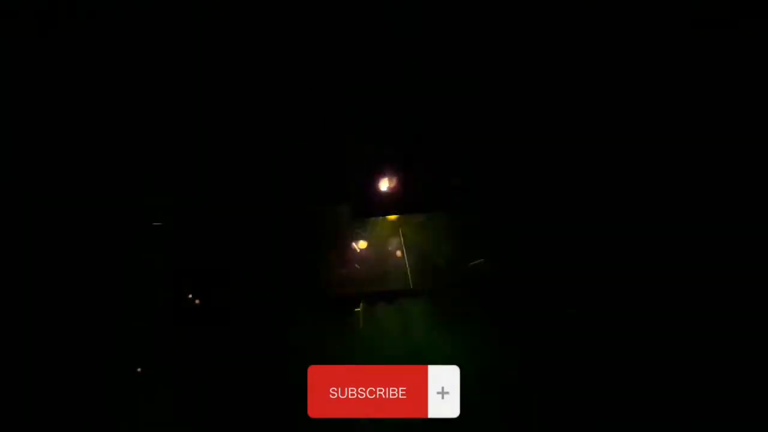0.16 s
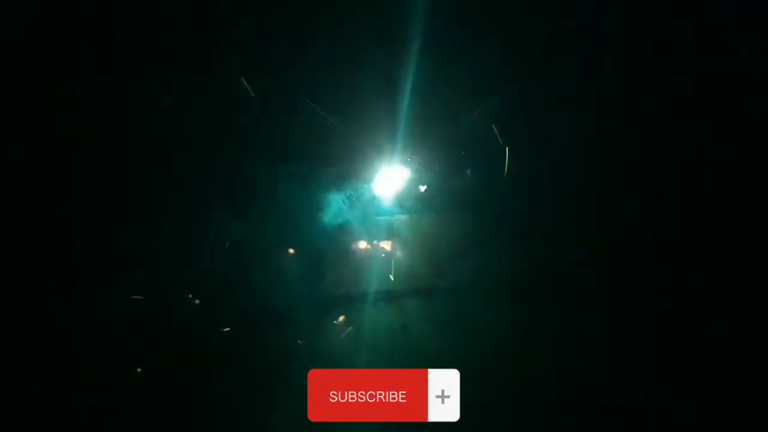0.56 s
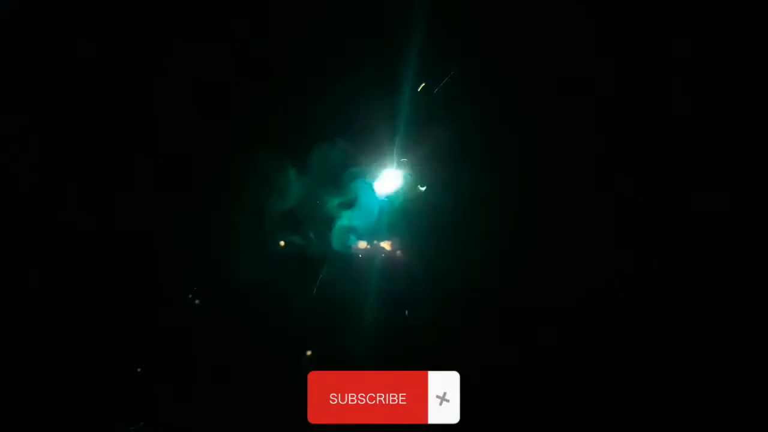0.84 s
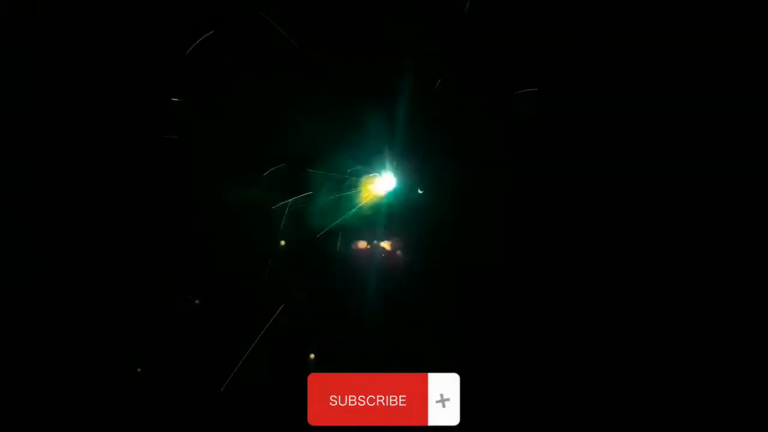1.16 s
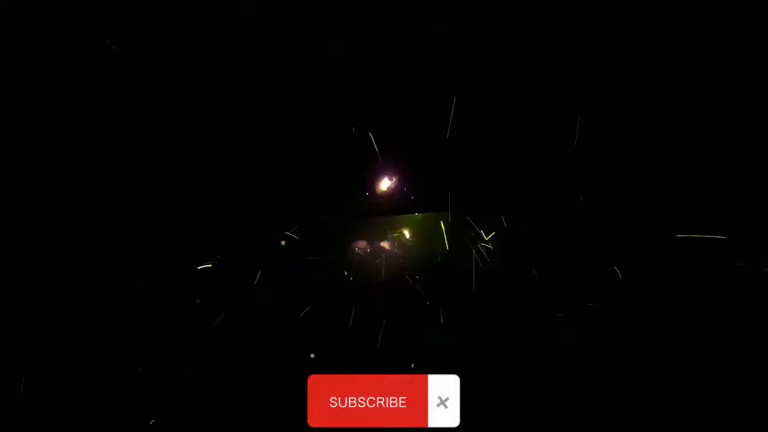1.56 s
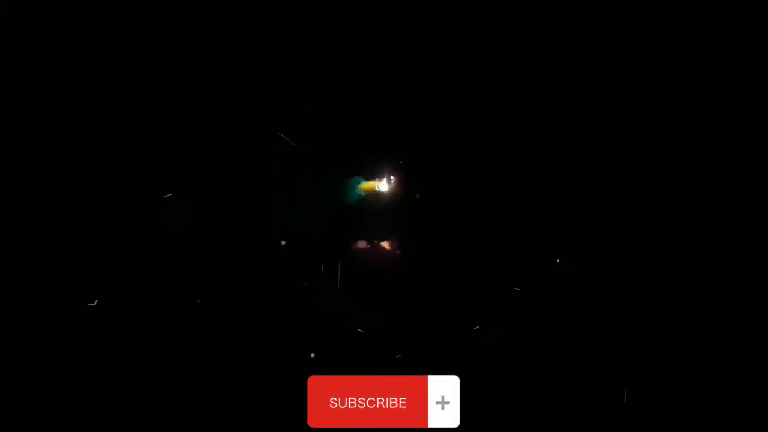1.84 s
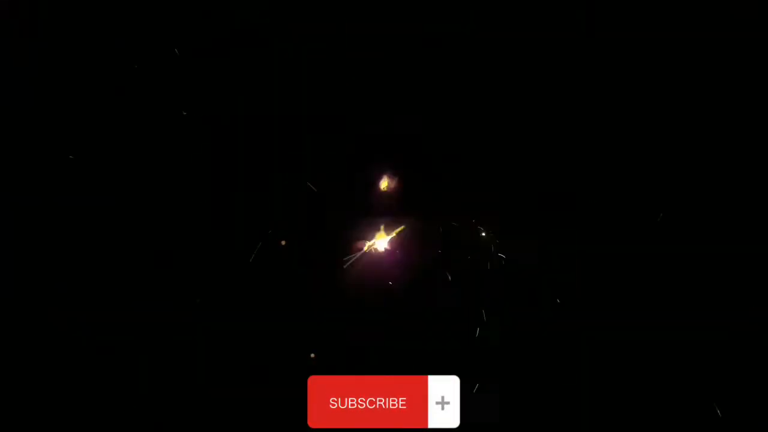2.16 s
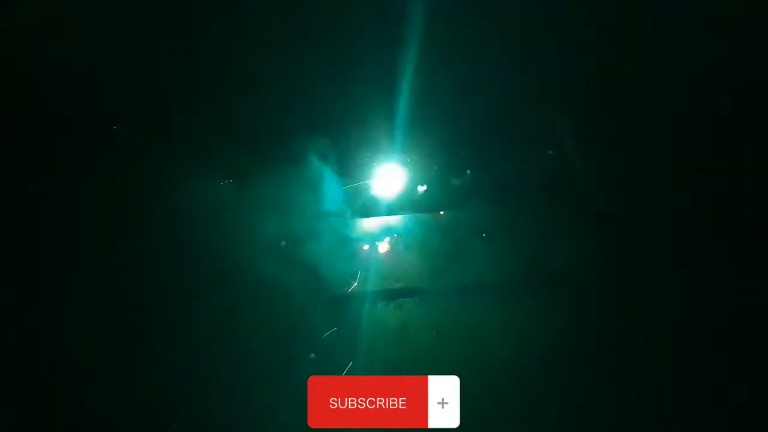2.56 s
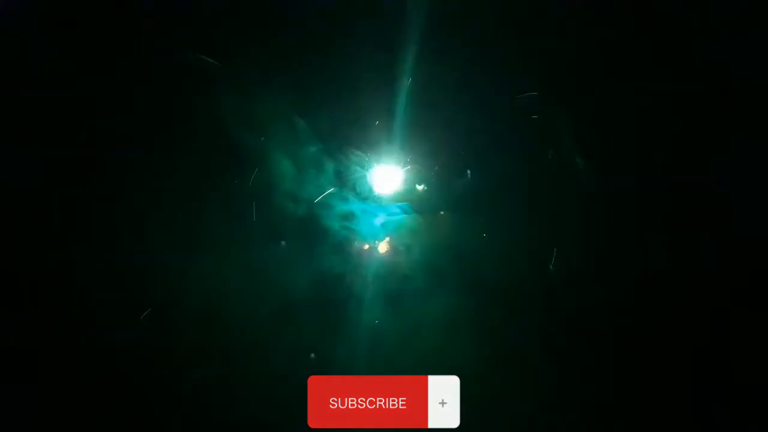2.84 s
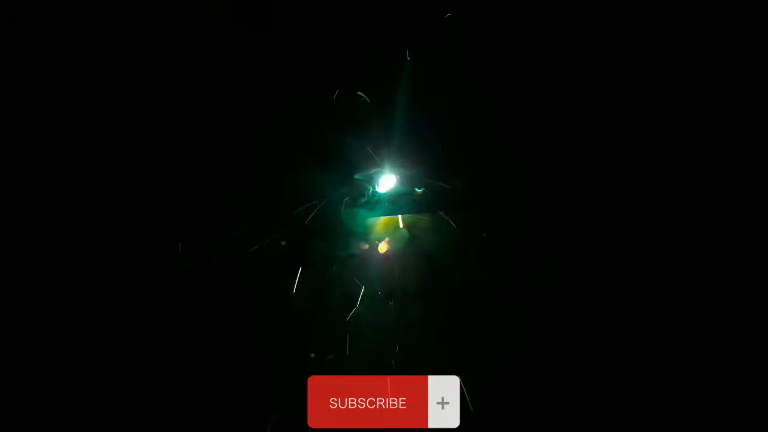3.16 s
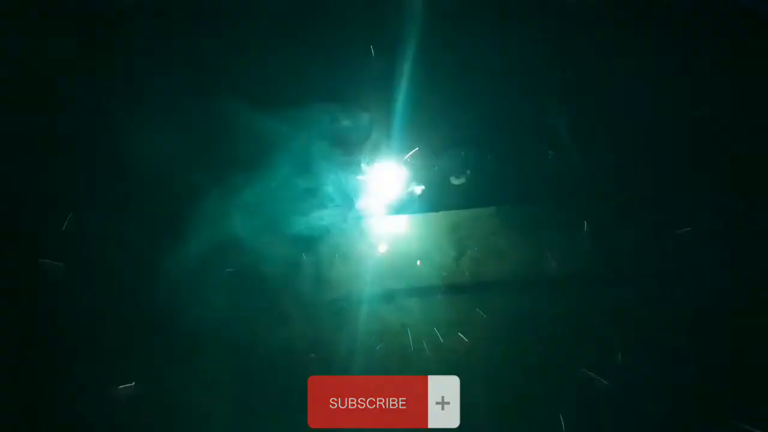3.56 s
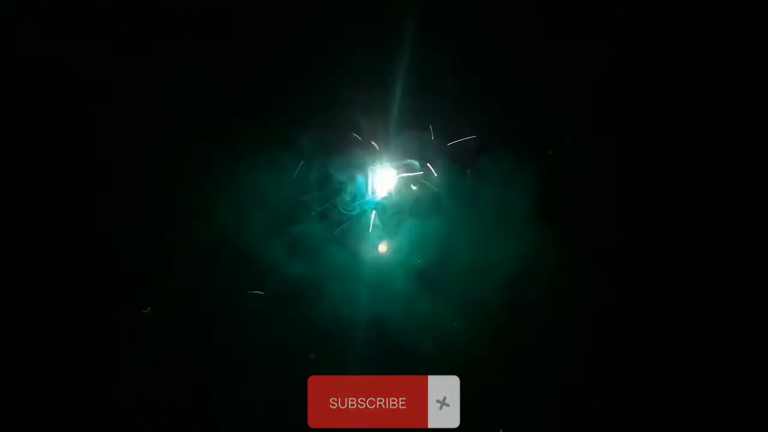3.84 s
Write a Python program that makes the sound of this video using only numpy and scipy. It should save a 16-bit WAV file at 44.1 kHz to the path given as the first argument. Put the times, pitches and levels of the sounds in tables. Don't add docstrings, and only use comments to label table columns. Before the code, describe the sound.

An electric welding arc sizzles and roars close to a small microphone, buzzing at about 100 hertz, with dense crackle, spitting drops and sharp spark cracks. At 1.5 s it stops, leaving short room ring and low hum. It relights at 1.7 s, with clustered hard snaps around 1.8, dies at 2.0, restarts near 2.2 and burns thinner, with a thumping snap at 2.4, scattered pops and fan drone swelling near the end.

```python
import sys
import numpy as np
from scipy import signal
from scipy.fft import rfft, irfft
from scipy.io import wavfile
from scipy.ndimage import uniform_filter1d

SR = 44100
rng = np.random.default_rng(int(sys.argv[2]) if len(sys.argv) > 2 else 0)


def dump(signal):
    limited = np.clip(np.atleast_2d(signal).T, -1, 1)
    pcm = np.round(limited * 32767).astype(np.int16)
    wavfile.write(sys.argv[1], SR, pcm)


def linear_from_db(decibels):
    return 10 ** (np.asarray(decibels, float) / 20)


N = 176400


def level(x, db):
    return x * linear_from_db(db) / np.sqrt(np.mean(x ** 2))


def colour(x, table):
    hz, db = np.array(table, float).T
    grid = np.maximum(np.fft.rfftfreq(4096, 1 / SR), 1)
    cepstrum = irfft(np.log(linear_from_db(np.interp(np.log(grid), np.log(hz), db))))
    cepstrum[1:2048] *= 2
    cepstrum[2049:] = 0
    return signal.fftconvolve(x, irfft(np.exp(rfft(cepstrum))))[:N]


def walk(rate):
    hold = int(SR / rate)
    steps = np.repeat(rng.standard_normal(N // hold + 1), hold)
    return 1.4 * uniform_filter1d(steps, hold)[:N]


def shop(t):
    # (frequency [Hz], level [dB])
    shop_tone = [(40, -21), (90, -5), (200, -2), (600, -8.5), (2500, -18.5), (8000, -41), (16000, -57)]
    # (time [s], pitch [Hz], level [dB])
    fan = [
        (0, 135, -61),
        (2.7, 139, -49),
        (3.0, 138.7, -56),
        (3.6, 137, -59),
        (3.8, 136.6, -40.5),
        (3.97, 137, -39.5),
        (4, 134, -54),
    ]
    # (time [s], level [dB])
    mains = [
        (0, -56),
        (1.3, -53),
        (1.5, -46),
        (3, -49),
        (4, -45),
    ]
    mains_hz = 50.1

    air = level(colour(rng.standard_normal(N), shop_tone), -47.5) * linear_from_db(walk(5.6))
    fan_s, fan_hz, fan_db = np.array(fan).T
    pitch = np.interp(t, fan_s, fan_hz) * (1 + 0.0041 * walk(7.8))
    drone = np.sin(2 * np.pi * np.cumsum(pitch) / SR) * linear_from_db(np.interp(t, fan_s, fan_db) + walk(17))
    hum_gain = linear_from_db(np.interp(t, *np.array(mains).T) + 2 * walk(8.15))
    transformer = hum_gain * np.sin(2 * np.pi * mains_hz * t + walk(12) / 2)
    return air + transformer + drone


def room(x):
    room_db, low_t60_s, high_t60_s = -6.5, 0.76, 0.3
    age = np.arange(SR // 2 * 2) / SR
    noise = rng.standard_normal(len(age)) * (age > .004)
    low = signal.lfilter([.4], [1, -.6], noise)
    tail = low * 1000 ** (-age / low_t60_s) + (noise - low) * 1000 ** (-age / high_t60_s)
    return linear_from_db(room_db) * signal.fftconvolve(x, tail / np.sqrt(np.sum(tail ** 2)))[:N]


def sparks(t):
    # (time [s], peak level [dB], pitch [Hz])
    spark_list = [(0.1478, -18, 4400), (0.176, -9.5, 7600), (0.2674, -14, 5200), (0.272, -14, 7700),
                  (0.2958, -5.5, 7400), (0.2973, -4.5, 8400), (0.4055, -13, 8000), (0.427, -11, 7100),
                  (0.4635, -15, 4900), (0.4941, 0, 6500), (0.7253, -1.5, 6700), (0.7444, -13, 6200),
                  (0.7647, -10, 7000), (0.8233, -20, 6500), (0.8741, -6.5, 6230), (0.8925, -11, 5900),
                  (0.995, -10, 6800), (1.025, -8, 8200), (1.0333, -6, 7800), (1.053, -12, 10500),
                  (1.057, -13, 8300), (1.1115, -4.5, 9000), (1.1158, -8, 8400), (1.1353, -4, 6400),
                  (1.152, -11, 7300), (1.1848, -10.5, 3900), (1.1915, -13, 8100), (1.2742, -12, 6100),
                  (1.3558, -17, 6500), (1.4336, -13, 7840), (1.4724, -13, 7900), (1.7426, -24, 9200),
                  (1.8646, -10, 10400), (1.93, -7, 8750), (2.2927, -9, 8150), (2.302, -11, 8540),
                  (2.452, -11, 10000), (2.4998, -10, 7100), (2.5224, -14, 7700), (2.5288, -15, 6400),
                  (2.6287, -14, 8200), (2.6815, -16, 9900), (2.7006, -10.5, 10000), (2.732, -25, 8400),
                  (2.8008, -15, 7300), (2.8463, -10.5, 7800), (2.9377, -7.5, 7700), (3.0147, -14, 7600),
                  (3.101, -13, 8900), (3.106, -15, 7200), (3.1465, -15, 8300), (3.1795, -18, 8000),
                  (3.1817, -21, 7100), (3.227, -10, 11800), (3.4549, -14, 7750), (3.4775, -12, 6900),
                  (3.6871, -2, 5600), (3.7573, -15.5, 5700), (3.868, -12.5, 6300), (3.9142, -4, 4900)]
    cycles, ring_db, ring_ms, spark_db = .5, -8, .4, -.6

    out = np.zeros(N)
    lead = 40
    age = t[:160] - t[lead]
    s, db, hz = np.array(spark_list).T[:, :, None]
    chance = rng.standard_normal((len(s), len(age) + 1))
    crack = np.cos(2 * np.pi * hz * age + chance[:, :1]) * np.exp(-(age * hz / cycles) ** 2)
    fade = np.exp(-np.abs(age) * (1 + 2 * (age < 0)) * 1000 / ring_ms)
    ring = linear_from_db(ring_db) * np.diff(uniform_filter1d(chance, size=2)) * fade
    both = crack + ring
    both = both * linear_from_db(db + spark_db) / np.abs(both).max(axis=1, keepdims=True)
    for i, spark in zip((s[:, 0] * SR).astype(int) - lead, both):
        out[i:i + len(age)] += spark
    return out


def snaps(t):
    snap_s = [.4943, .6569, .9833, 1.062, 1.792, 1.7925, 1.8115, 1.8121, 1.8146, 1.8226, 1.8261, 2.3873,
              2.4113, 3.071, 3.4582, 3.4666]
    # (spike level [dB], thump level [dB])
    snap_db = [(-39, -18), (-4, -8.5), (-3, -21), (1.5, -8.5), (-7.5, -12.5), (4, -13.5), (-5.5, -9),
               (1.5, -8), (-6, -31), (-20, -39), (-5.5, -24), (-8, 0), (-6.5, -40), (-8, -10.5),
               (-12, -18.5), (-13, -34)]
    spike_ms, rebound_ms, crack_ms, thump_ms = .04, .12, .2, 1.45
    rebound_db, crack_db = -8, -4

    out = np.zeros(N)
    lead = 20
    ms = (t[:2000] - t[lead]) * 1000
    after = (1 + np.tanh((ms - 2 * spike_ms) / spike_ms * 2)) / 2
    rebound = linear_from_db(rebound_db) * after * np.exp(-ms / rebound_ms)
    spike = np.exp(-(ms / spike_ms) ** 2 / 2) - rebound
    thump = after * np.exp(-ms / thump_ms)
    cracks = rng.standard_normal((len(snap_db), len(ms))) * linear_from_db(crack_db) * np.exp(-np.abs(ms) / crack_ms)
    for s, (spike_db, thump_db), crack in zip(snap_s, snap_db, cracks):
        i = int(s * SR) - lead
        sharp = spike + np.diff(crack, prepend=0) / 2
        out[i:i + len(ms)] += linear_from_db(spike_db) * sharp - linear_from_db(thump_db) * thump
    return out


def splutters(t):
    # (time [s], peak level [dB], bright minus dull [dB], decay [ms])
    burst_list = [(0.145, -10, -8, 13), (0.1698, -6, -0.5, 15), (0.2667, -9, -4, 3.4),
                  (0.2943, 1, 24, 4.9), (0.424, -9, 16, 3.2), (0.493, 0, 0, 3), (0.6562, 5, 4, 2.6),
                  (0.7232, -2.5, 14, 3.1), (0.762, -12, 8, 3.5), (0.8729, -2.5, 22, 3),
                  (0.8901, -10.5, -15, 3.7), (0.9828, -5, 12, 6.2), (1.0318, -5, 12, 2.4),
                  (1.1096, -3, 13, 4.1), (1.1342, -4, 17, 2.1), (1.1498, -3.5, -3, 1.9),
                  (1.184, -8.5, -11, 7.1), (1.2724, -14, -20, 3.4), (1.3515, -13, -4, 5.1),
                  (1.4116, -13.5, -16, 8.4), (1.4716, -14.5, -7.5, 5), (1.71, -24, 5, 2.5),
                  (1.8609, -4, -2.5, 1.9), (1.9285, -4, -2, 4.3),
                  (2.1121, -30.5, -8, 3.9), (2.2086, -30, 3, 2.3), (2.2905, -12, 2, 2.5),
                   (2.3011, -8.5, 0.5, 1.7), (2.3484, -8.5, 5, 2.1), (2.627, -10.5, 2, 6),
                   (2.6774, -14, -1, 3.7), (2.6982, -23, 4, 2.3), (2.7995, -28, 3, 3.4),
                   (2.8444, -14, -1, 2.9), (2.9243, -13, 1, 5.1), (2.9366, -3.5, 2, 2.2),
                   (3.0985, -17, 9, 4), (3.1454, -12, 2, 5.4), (3.1774, -19, -1, 4.7),
                   (3.2247, -7, -2.5, 3.8), (3.456, -8.5, 0, 4.7), (3.4655, -10.5, 7, 3.8),
                   (3.686, -3.5, 3.5, 2.6), (3.756, -15, 5, 4.6), (3.8666, -9, 8, 9.9), (3.9062, -7, 14, 2),
                   (1.051, -7, 4, 4), (1.76, -18, 14, 3), (1.841, -16, -8, 3), (3.913, -6, 0, 7)]
    splutter_db, lag_s = -6.5, .001
    tick_db, tick_ms, spits_per_s = 6, .025, 900
    fizz_db, fizz_s = -15, 0.04

    out = np.zeros(N + 5000)
    age = t[:5000]
    s, db, tilt_db, ms = np.array(burst_list).T[:, :, None]
    chance = rng.standard_normal((len(s), 3, len(age)))
    spits = 1 + 2.77 * (rng.random((len(s), len(age))) < spits_per_s / SR)
    ragged = linear_from_db(13.6 * uniform_filter1d(chance[:, 2], size=40)) * spits
    tick = linear_from_db(tick_db) * np.exp(-age / tick_ms * 1000) * (age > 0)
    spitting = np.exp(-age / np.maximum(ms, .2) * 1000) * ragged
    shape = spitting + linear_from_db(fizz_db) * np.exp(-age / fizz_s)

    bright_filter = signal.butter(2, 5500, "high", fs=SR, output="sos")
    dull_filter = signal.butter(1, [600, 5500], "band", fs=SR, output="sos")
    bright = signal.sosfilt(bright_filter, tick + shape * chance[:, 0])
    dull = signal.sosfilt(dull_filter, tick + shape * chance[:, 1])
    bursts = linear_from_db(tilt_db / 2) * bright + linear_from_db(-tilt_db / 2) * dull
    bursts = bursts * linear_from_db(db + splutter_db) / np.abs(bursts).max(axis=1, keepdims=True)
    for i, burst in zip(((s[:, 0] + lag_s) * SR).astype(int), bursts):
        out[i:i + len(age)] += burst
    return out[:N]


def patchy(x):
    spectrum = rfft(x)
    octave = np.log2(np.maximum(np.fft.rfftfreq(N, 1 / SR), 1) / 60)
    place = np.clip(octave, 0, 8) * 1.5
    out = np.zeros(N)
    for k in range(13):
        band = irfft(spectrum * np.maximum(1 - np.abs(place - k), 0), N)
        out += band * linear_from_db(1.6 * walk(14))
    return out


def arc(t):
    # (time [s], sizzle level [dB], roar level [dB], throb depth [0-1])
    arc_course = [(0, -35, -32, 0.32), (.13, -49, -40.5, 0), (.15, -34.5, -33, 0.54),
                  (.85, -34.5, -39, 0.12), (1.1, -30.5, -37, 0.55), (1.35, -41, -33.5, 0.7),
                  (1.47, -28.5, -38, 0), (1.5, -78, -77, .4), (1.705, -67, -67, 0.06),
                  (1.712, -43, -57, .4), (1.96, -38, -31.5, 0.1), (1.99, -83, -71, 0.3),
                  (2.175, -65, -73, .4), (2.185, -41.5, -37.5, 0.4), (2.5, -36.5, -46, 0.58),
                  (3.1, -41, -47.5, 0.03), (3.4, -41, -39, 0.57), (4, -34, -39, 0.1)]
    # (time [s], level [dB])
    current = [(0, -44), (.3, -45.5), (.55, -45.5), (.65, -42.5), (1.13, -67), (1.2, -43), (1.47, -48.5),
               (1.52, -65.5), (1.88, -55), (1.95, -46), (2.0, -78), (2.17, -63), (2.2, -45), (2.4, -52),
               (2.6, -66), (3.18, -54), (3.28, -47), (4, -52.5)]
    # (time [s], bright minus dull [dB])
    arc_tilt = [(0, -3), (.3, -2), (.55, -3), (.9, -0.5), (1.15, 0), (1.4, -6.5), (1.7, 1.5), (1.8, 5),
                (1.95, -5), (2.25, -1), (2.5, -0.5), (2.95, 2), (3.2, 1), (3.35, -3), (3.6, -1), (3.75, -3),
                (4, 1.5)]
    # (multiple of the ripple rate [-], level [dB])
    hum_tones = [
        (1, 5.5),
        (2, -3),
        (3, -3),
    ]
    # (frequency [Hz], level [dB])
    sizzle_tone = [(500, -22), (1200, -3), (2500, -9), (4000, 0.5), (8000, 1), (16000, 0.5)]
    # (frequency [Hz], level [dB])
    roar_tone = [(60, -16.5), (130, -1.5), (300, -5), (1000, -9.5), (3000, -15.5), (8000, -25)]
    ripple_hz, ripple_rad, hum_rad = 100.27, 1.95, 0.41
    cycle_spread_db, flicker_db = 2.2, .8
    crackles_per_s, crackle_db, crackle_spread_db, crackle_top_db = 1300, 0, 4, 11
    hum_flutter_db, hum_wobble_rad, tilt_hz = 3, .7, 6500

    s, *controls = np.array(arc_course).T
    sizzle_db, roar_db, depth = (np.interp(t, s, c) for c in controls)
    depth = np.clip(depth, 0, 1)

    turn = 2 * np.pi * ripple_hz * t
    cycle = ((turn + ripple_rad + np.pi) / (2 * np.pi)).astype(int)
    spread = np.clip(rng.standard_normal(cycle[-1] + 1), -2, 2)
    size = linear_from_db(cycle_spread_db * spread)[cycle]
    swell = ((1 + np.cos(turn + ripple_rad)) / 2) ** 1.5
    throb = (1 - depth + 1.65 * depth * size * swell) * linear_from_db(flicker_db * walk(22.14))

    chance = rng.random((N, 3)).T
    struck = chance[0] < crackles_per_s / SR * 2 * swell
    strength_db = np.minimum(-crackle_spread_db * np.log(chance[2] + 1e-9), crackle_top_db)
    clicks = struck * np.sign(chance[1] - .5) * linear_from_db(strength_db)
    grain = rng.standard_normal(N) + level(clicks, crackle_db)
    sizzle = level(colour(grain, sizzle_tone), 0) * throb * linear_from_db(sizzle_db)
    dull = signal.sosfilt(signal.butter(2, tilt_hz, fs=SR, output="sos"), sizzle)
    tilt = linear_from_db(np.interp(t, *np.array(arc_tilt).T) / 2)
    sizzle = dull / tilt + (sizzle - dull) * tilt

    roar = level(colour(rng.standard_normal(N), roar_tone), 0) * throb ** 1.04 * linear_from_db(1.17 * walk(8.1))
    hum = np.zeros(N)
    for k, db in hum_tones:
        flutter = linear_from_db(db + hum_flutter_db * walk(24.07))
        hum += flutter * np.cos(k * (turn + hum_rad) + hum_wobble_rad * walk(14))
    return patchy(sizzle + roar * linear_from_db(roar_db)) + hum * linear_from_db(np.interp(t, *np.array(current).T))


def scene():
    # (frequency [Hz], level [dB])
    mic = [(1500, -0.5), (4500, 4), (6400, -1), (8400, 6), (10000, -5.5), (12500, -1), (14500, 1.5),
           (15700, -2)]
    t = np.arange(N) / SR
    weld = arc(t) + splutters(t)
    cracks = sparks(t)
    heard = colour(weld + room(weld + cracks), mic) + cracks + snaps(t)
    return np.array([heard]) + shop(t)


def roll_off(x):
    return signal.sosfilt(signal.butter(12, 16810, fs=SR, output="sos"), x)


def record(dry):
    low_cut = signal.butter(2, 81, "high", fs=SR, output="sos")
    clipped = np.clip(signal.sosfilt(low_cut, dry), -.93, .93)
    cliff = signal.ellip(10, .3, 42, 15620, fs=SR, output="sos")
    end = signal.ellip(8, .3, 60, 16800, fs=SR, output="sos")
    mix = signal.sosfilt(np.vstack([cliff, end]), clipped)
    return roll_off(mix)


dry = scene()
out = record(dry)
dump(out)
```